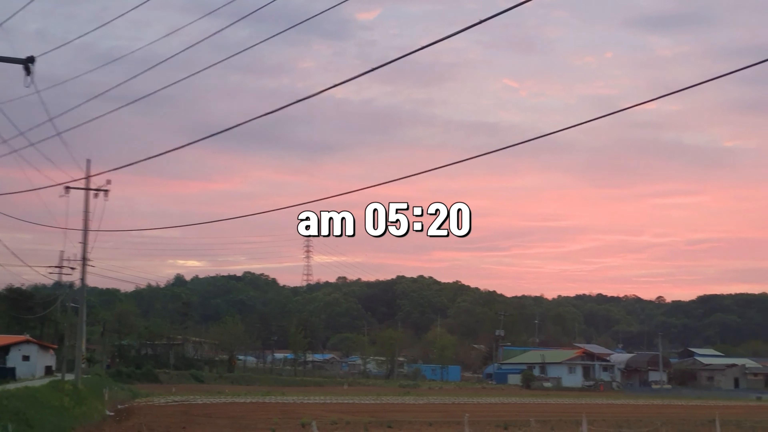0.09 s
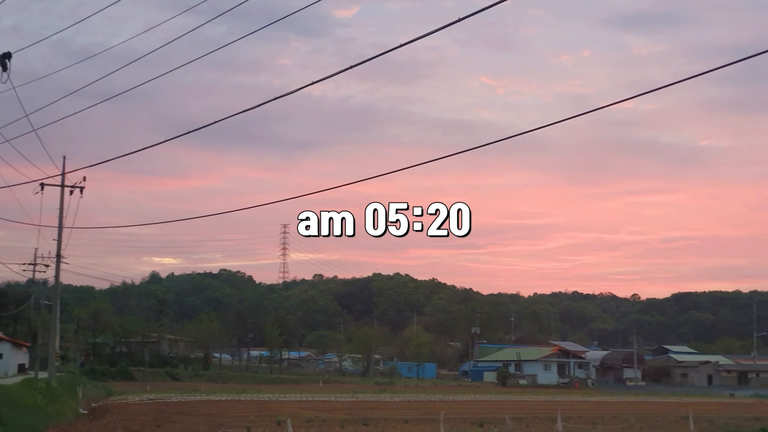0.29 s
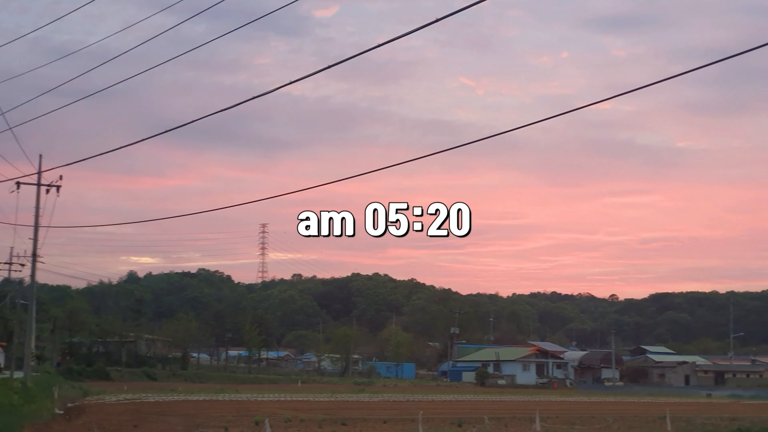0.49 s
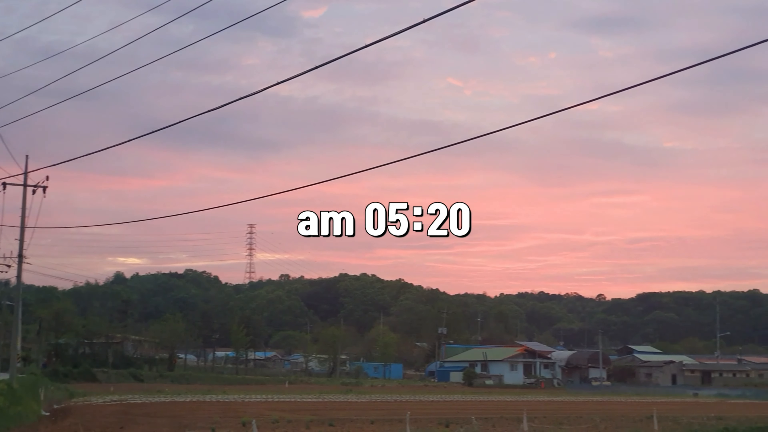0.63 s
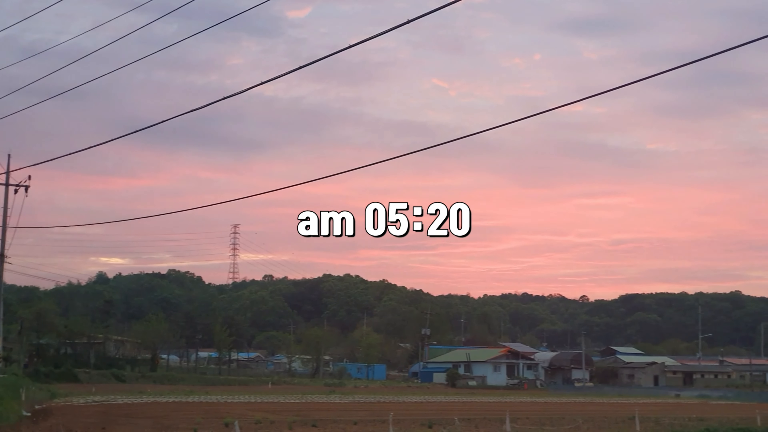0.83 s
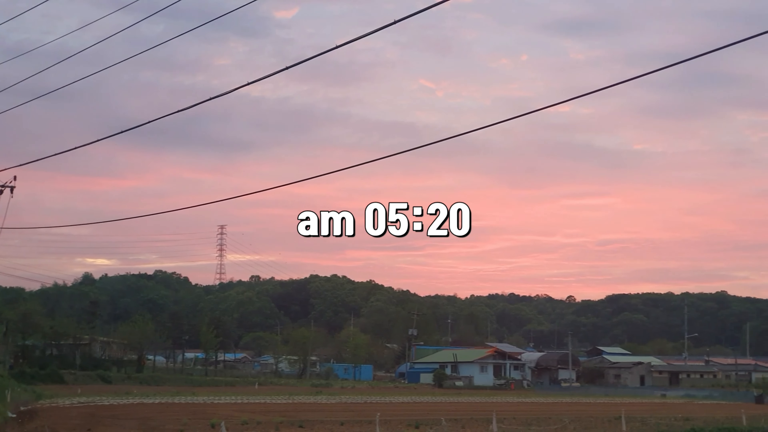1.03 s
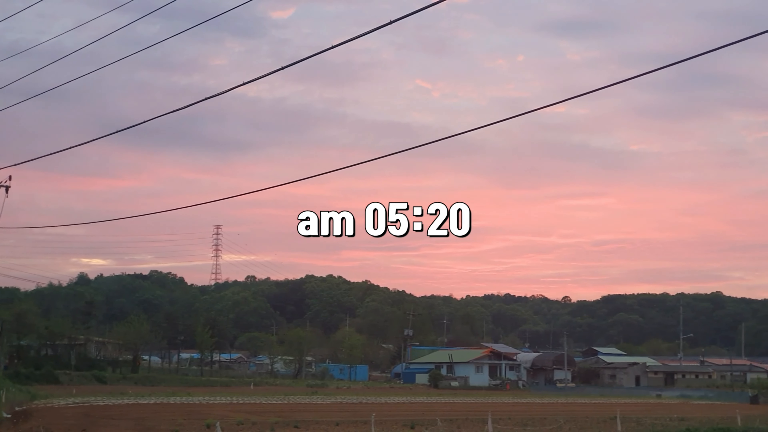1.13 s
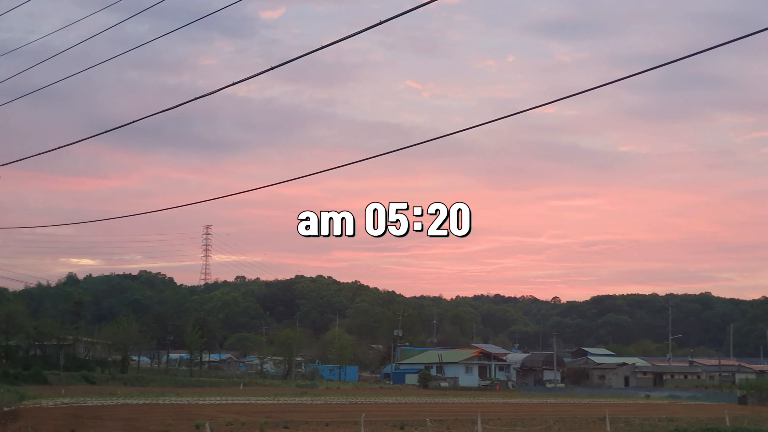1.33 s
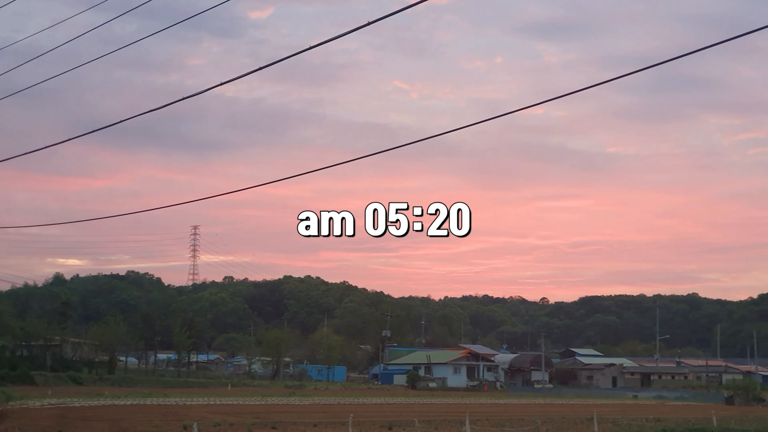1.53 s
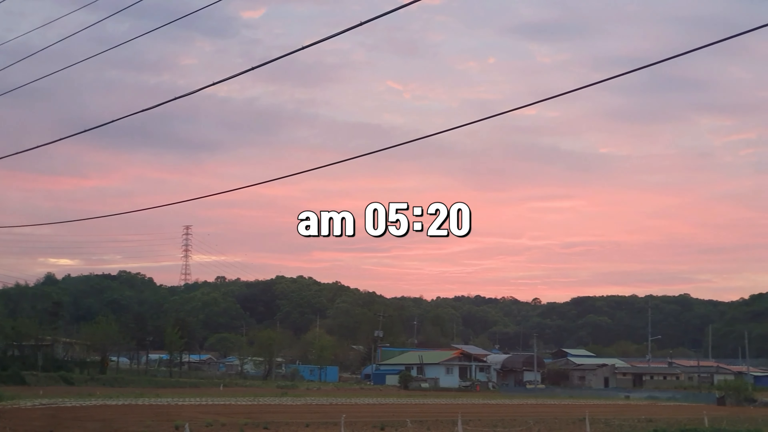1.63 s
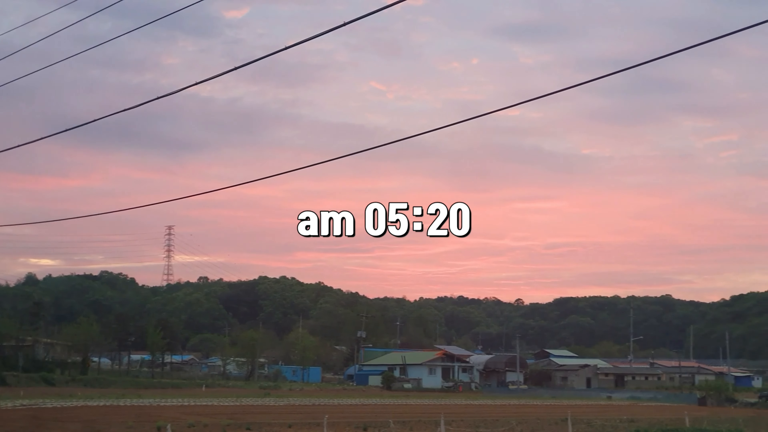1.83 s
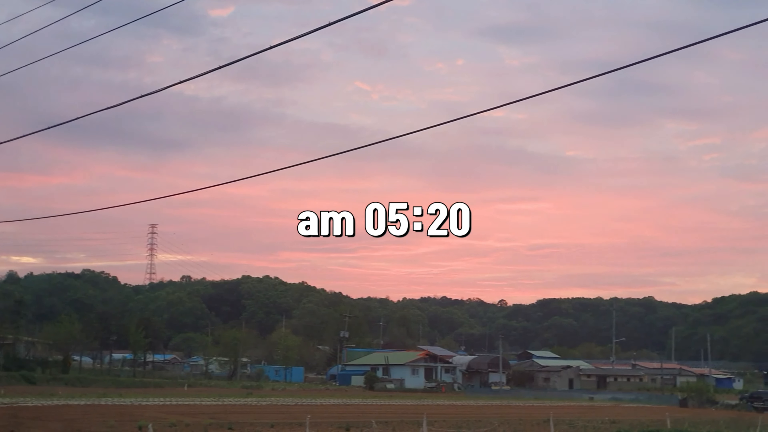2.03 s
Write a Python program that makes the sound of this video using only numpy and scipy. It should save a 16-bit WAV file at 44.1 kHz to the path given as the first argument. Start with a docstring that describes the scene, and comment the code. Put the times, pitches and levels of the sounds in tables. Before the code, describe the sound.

Many small birds sing over quiet farmland, one near with buzzy bursts and later a crisp chirp, others echoing in trees; distant wavering call, faint cow, soft low rumble and hum, picked up outdoors in stereo.

```python
"""Fields at dawn: a small bird close by gives two raspy bursts of twitter, a lone later buzz and a few clear
chirps, while others whistle from the trees and a far chorus blurs into echo. A faint drawn-out call carries
from the farms and a cow starts to low, over a soft hum and the rumble of open air. Birds are gliding sines
with frequency modulation, call and cow are wavering partials, air is shaped noise, and echo is
convolution with decaying noise."""
import sys
import numpy as np
from scipy import signal
from scipy.fft import rfft, irfft
from scipy.io import wavfile

SR = 44100
rng = np.random.default_rng(int(sys.argv[2]) if len(sys.argv) > 2 else 0)


def master(y):
    """Save y as 16-bit WAV."""
    cut = np.clip(np.atleast_2d(y).T, -1, 1)
    pcm = np.round(cut * 32767)  # scale
    wavfile.write(sys.argv[1], SR, pcm.astype(np.int16))


N = 92610

CHIRP_RASP = .009  # spread of the pitch tremble, as a share of the pitch
CLEAR_OCTAVE_DB = -36  # octave overtone of every bird note but the twitter, and of the murmurs


def undb(db):
    """Amplitude gain is exponential in decibels."""
    return 10 ** (np.asarray(db) / 20)


def unit(x):
    """Normalisation: dividing by the root mean square gives unit power."""
    return x / np.sqrt(np.mean(x ** 2) + 1e-20)


def bin_hz():
    """The discrete Fourier transform samples the spectrum at equal steps of frequency."""
    return np.arange(N // 2 + 1) * SR / N


def on_bins(points):
    """Logarithmic frequency scale: a (Hz, value) curve is interpolated over log frequency."""
    hz, value = np.array(points, float).T
    return np.interp(np.log(bin_hz() + 1e-3), np.log(hz), value)


def coloured(points):
    """Spectral shaping: white noise is weighted by a (Hz, dB) curve, at rms 1."""
    white = rfft(rng.standard_normal(N))
    return unit(irfft(white * undb(on_bins(points)), N))


def walk(rate_hz):
    """Low-pass noise: a Gaussian filter leaves a smooth random motion of rms 1."""
    white = rfft(rng.standard_normal(N))
    return unit(irfft(white * np.exp(-(bin_hz() / rate_hz) ** 2), N))


def curve(rows):
    """Envelope: (seconds, value) rows joined by straight lines."""
    rows = np.array(rows, float)
    return np.interp(np.arange(N) / SR, rows[:, 0], rows[:, 1])


def scatter(x, t60, build_s):
    """Diffuse reverberation from trees and hills: convolution with decaying noise, independent in each ear."""
    t = np.arange(SR) / SR
    decay = np.exp(-np.log(1000) * t / t60)  # down 60 dB after t60 seconds
    build = 1 - np.exp(-t / build_s)
    tail = rng.standard_normal((2, SR)) * decay * build
    tail /= np.sqrt(np.sum(tail ** 2, axis=1, keepdims=True))
    return signal.fftconvolve(np.atleast_2d(x), tail, axes=1)[:, :N]


def sing(notes, rasp, octave_db, buzz=0):
    """Frequency modulation: a sine arcs through three pitches, with tremble, weak octave and optional buzz."""
    tremble_hz, buzz_hz = 280, 490
    attack_s, release_s = .0018, .002
    swell_share = .28  # longer notes swell in over this share of their length
    out = np.zeros((2, N))
    tremble = walk(tremble_hz)
    for start, length, first, middle, last, db, pan_db in notes:
        i = np.arange(max(int(start * SR), 0), min(int((start + length) * SR), N))
        t = i / SR - start
        parabola = np.polyfit([0, .5, 1], [first, middle, last], 2)
        arc = np.polyval(parabola, t / length)
        # the tremble also unsettles the phase of the buzz
        shake = rasp * tremble[i] + buzz * np.sin(2 * np.pi * buzz_hz * t + tremble[i] / 2)
        phase = 2 * np.pi * np.cumsum(arc * (1 + shake)) / SR
        fade_in = np.sin(np.pi / 2 * np.clip(t / max(attack_s, swell_share * length), 0, 1))
        fade_out = np.sin(np.pi / 2 * np.clip((length - t) / release_s, 0, 1))
        wave = np.sin(phase) + undb(octave_db) * np.sin(2 * phase)
        tone = np.sqrt(2) * fade_in * fade_out * wave
        out[:, i] += undb(db + np.array([[pan_db], [-pan_db]]) / 2) * tone
    return out


def late(x, delay_s):
    """Fourier shift theorem: a phase linear in frequency delays the sound by a fraction of a sample."""
    return irfft(rfft(x) * np.exp(-2j * np.pi * bin_hz() * delay_s), N)


def nearby(x, lag_s):
    """Interaural delay and specular reflection: the right ear lags, and close surfaces add distinct echoes."""
    # Echoes off ground and walls. Each row: delay in seconds, gain at left in dB, gain at right in dB.
    echoes = [(.0042, -41, -6.5), (0.0171, -6.5, -19.5)]
    x = np.array([x[0], late(x[1], lag_s)])
    out = x.copy()
    for delay_s, *gains_db in echoes:
        out += np.array([undb(db) * late(side, delay_s) for side, db in zip(x, gains_db)])
    return out


def field(points, alike):
    """Interaural correlation: independent sum and difference noises are weighted to set left-right likeness."""
    mid = irfft(rfft(coloured(points)) * np.sqrt(1 + alike), N)
    side = irfft(rfft(coloured(points)) * np.sqrt(1 - alike), N)
    return unit(np.array([mid + side, mid - side]))


def hum():
    """Steady tones of distant machinery: sines slowly modulated in amplitude and phase."""
    # Each row: frequency in Hz, mean level in dB.
    hum_tones = [(58.3, -60), (115.3, -64)]
    t = np.arange(N) / SR
    out = np.zeros(N)
    for hz, db in hum_tones:
        level = undb(db + 1.96 * walk(8.7))
        out += np.sqrt(2) * level * np.sin(2 * np.pi * hz * t + .78 * walk(3.5))
    return out


def air():
    """Broadband noise: a fluttering low rumble and a thin high hiss, partly alike in the two ears, with hum."""
    # Spectrum of the rumble. Each row: frequency in Hz, relative density in dB per Hz.
    low_shape = [(12, -34), (22, -1.5), (45, -0.5), (100, -5), (150, -10), (200, -8), (330, -15),
                 (500, -11.5), (720, -18.5), (1100, -20.5), (1900, -71)]
    # Spectrum of the hiss. Each row: frequency in Hz, relative density in dB per Hz.
    high_shape = [(700, -7.5), (900, 6.5), (1500, 1.5), (2200, -0.5), (3100, 3), (5000, -4), (7400, -1.5),
                  (9000, -14.5), (12000, -9.5), (15500, -9.5)]
    # Left-right correlation. Each row: frequency in Hz, correlation from -1 to 1.
    likeness = [(30, 0.58), (120, 0.9), (300, 0.8), (700, -0.074), (1500, -0.48), (5000, 0.17),
                (15000, -0.09)]
    alike = np.clip(on_bins(likeness), -.95, .95)
    flutter_db = 1.2 * walk(17)
    low = undb(-53 + flutter_db) * field(low_shape, alike) + hum()
    high = undb(-55) * field(high_shape, alike)
    # both lean to the left
    return low * undb([[.8], [-.8]]) + high * undb([[.6], [-.6]])


def murmurs():
    """Reverberant blurring: soft, dull, distant sounds are low gliding tones smeared by echo."""
    # Each row: start and length in seconds, start, middle and end pitch in Hz,
    # level in dB before the mix below, left minus right in dB.
    murmur_notes = [(.2, 0.066, 510, 472, 478, -61.5, 0.5), (.45, 0.087, 231, 308.5, 323, -62.5, 3.5),
                    (.45, 0.081, 174, 188, 187, -59.5, 1)]
    voice = sing(murmur_notes, .022, CLEAR_OCTAVE_DB)
    return undb(5.5) * voice + undb(-6) * scatter(voice, t60=.33, build_s=.0061)


def far_call():
    """Selective propagation: of a long wavering animal call only the strongest partial carries over the fields."""
    # Each row: time in seconds, level in dB.
    call_level = [(.15, -75), (.42, -63), (.59, -56), (.9, -61), (.99, -52), (1.04, -64), (1.18, -53),
                  (1.33, -62), (1.55, -60), (1.8, -71)]
    pitch_hz = 981 * (1 + .033 * walk(100))
    phase = 2 * np.pi * np.cumsum(pitch_hz) / SR
    tone = np.sin(phase) * undb(3.9 * walk(26))
    return undb(curve(call_level)) * unit(tone + undb(-3.5) * scatter(tone, t60=.23, build_s=.006))


def cow():
    """Harmonic series: a faint low sums multiples of one nearly steady fundamental."""
    # Each row: time in seconds, level in dB before the harmonics are weighted.
    moo_level = [(.7, -66), (1.3, -66.5), (1.52, -64.5), (1.62, -53.5), (1.72, -66), (2.1, -61.5)]
    # Each row: multiple of the fundamental, relative level in dB.
    harmonics = [(1, -0.5), (2, -11), (3, -0.5), (9, -6.5)]
    pitch_hz = 187.9 * (1 + .0079 * walk(25.5))
    phase = 2 * np.pi * np.cumsum(pitch_hz) / SR
    voice = sum(undb(db) * np.sin(round(k) * phase) for k, db in harmonics)
    voice = voice * undb(curve(moo_level))
    return voice + undb(-4) * scatter(voice, t60=.45, build_s=.02)


def chorus():
    """Diffuse field: a crowd of random far notes is heard only through its reverberation."""
    # Each row: time in seconds, relative level in dB.
    chorus_swell = [(0, -10), (.4, -2), (1.2, -4), (1.42, -2.5), (1.75, 3.5), (2.1, -1.5)]
    notes_per_s, note_s = 130, .03
    centre_hz, octaves = 4250, .6  # pitches spread this many octaves either way
    glide_range = .22  # span of the random pitch bends, as a share of the pitch
    notes = []
    for when, size, bend, slope, pitch, loud in rng.random((int(notes_per_s * N / SR), 6)):
        hz = centre_hz * 2 ** (octaves * (2 * pitch - 1))
        glide = glide_range * (slope - .5)
        middle_hz = hz * (1 + glide_range * (bend - .5))
        length_s = note_s * (.5 + size)
        notes.append((when * N / SR, length_s, hz * (1 - glide), middle_hz, hz * (1 + glide), -8 * loud, 0))
    voice = sing(notes, CHIRP_RASP, CLEAR_OCTAVE_DB)
    return undb(-52.5 + curve(chorus_swell)) * unit(scatter(voice, t60=.15, build_s=.005))


def whistles():
    """Direct-to-reverberant ratio: birds in the trees send more echo than direct sound."""
    # Each row: start and length in seconds, start, middle and end pitch in Hz,
    # level in dB before the mix below, left minus right in dB.
    whistle_notes = [(0, 0.011, 3210, 3046, 3000, -39.5, -2.5), (.335, 0.026, 5630, 5670, 3800, -47, 9),
                     (.426, 0.014, 5460, 6020, 6040, -47.5, -12.5),
                     (.472, 0.012, 5000, 4950, 4760, -49.5, -7), (.49, 0.054, 3840, 3944, 4510, -55, 12.5),
                     (.495, 0.052, 7400, 7900, 8930, -64.5, -14), (.55, 0.145, 4490, 4550, 4570, -60, -10),
                     (.615, 0.043, 3216, 3024, 2957, -48.5, -2), (.59, .16, 7440, 7490, 7240, -65, -15),
                     (.38, 0.039, 4230, 3580, 4340, -52, 2), (.682, 0.02, 4380, 3980, 3990, -48.5, 8),
                     (.703, 0.035, 3000, 3130, 3200, -54, 2), (.78, 0.021, 4030, 3360, 2830, -58, 9),
                     (.71, 0.034, 5220, 5450, 5410, -57, -5), (.835, 0.022, 2610, 3260, 3820, -48.5, 7),
                     (.98, 0.014, 5190, 5800, 6000, -59, -2), (.994, 0.013, 2820, 3070, 3000, -45.5, 1),
                     (1.02, 0.0094, 5100, 5510, 6100, -48.5, 14), (1.075, 0.031, 3553, 4290, 5200, -52, 11),
                     (1.10, 0.016, 4870, 4490, 3800, -45, -3), (1.12, 0.019, 3130, 3170, 3150, -51, 2),
                     (1.252, 0.025, 5700, 5800, 6300, -47.5, -4), (1.292, 0.03, 4820, 5090, 5800, -51, -8),
                     (1.35, 0.039, 3056, 3190, 3040, -50.5, 10), (1.44, 0.064, 5596, 4440, 4110, -46, 1),
                     (1.502, 0.025, 2630, 2550, 2230, -57, 11.5), (1.543, 0.032, 2790, 3250, 3390, -48, 3),
                     (1.59, 0.034, 2860, 3115, 3280, -46, 8), (1.61, 0.022, 4510, 4740, 5160, -44, -1),
                     (1.712, 0.017, 3140, 3590, 3780, -44, 0), (1.752, .012, 3780, 2950, 2270, -56.5, 12),
                     (1.77, 0.061, 5550, 5320, 5470, -58, -15), (1.818, 0.024, 4550, 4560, 4750, -47.5, -4),
                     (1.848, 0.016, 5830, 5350, 4860, -61, 0), (1.81, .014, 3450, 3346, 2540, -49, 9),
                     (1.866, 0.0084, 3570, 2930, 2740, -53, 17.5),
                     (1.959, 0.024, 4850, 4590, 4660, -44.5, 1), (1.993, 0.0076, 2600, 2440, 1980, -48, -5),
                     (1.99, 0.024, 3900, 3220, 2560, -46, 3.5)]
    voice = sing(whistle_notes, .016, CLEAR_OCTAVE_DB)
    return undb(-3) * voice + undb(-.3) * scatter(voice, t60=.21, build_s=.001)


def chirps():
    """Near-pure tones: short clear notes close by reach the left ear first and leave a light tail."""
    # Each row: start and length in seconds, start, middle and end pitch in Hz,
    # level in dB, left minus right in dB.
    chirp_notes = [(.635, 0.0059, 2840, 3140, 3040, -37, 5), (1.012, 0.0052, 3140, 3190, 2880, -38, 5),
                   (1.199, 0.0075, 3080, 3100, 3350, -44, 11),
                   (1.336, 0.0064, 3360, 3060, 3120, -36.5, 7.5), (1.473, 0.014, 4950, 5900, 6200, -41, -7),
                   (1.631, 0.01, 3840, 4100, 4400, -41.5, 11),
                   (1.638, 0.0095, 4490, 4745, 5150, -27.5, -3.5),
                   (1.647, 0.0053, 5270, 5650, 4850, -29.5, -5.5),
                   (1.651, 0.011, 5230, 4250, 3700, -33.5, 2), (1.674, 0.015, 3950, 4240, 4110, -25.5, -4)]
    voice = sing(chirp_notes, CHIRP_RASP, CLEAR_OCTAVE_DB)
    return nearby(voice, lag_s=.000429) + undb(-15.5) * scatter(voice, t60=.43, build_s=.003)


def twitter():
    """Fast frequency modulation: shaken whistles buzz among thin gliding strokes, with hiss and foliage echoes."""
    # Buzzes, whistles shaken very fast. Each row: start and length in seconds,
    # start, middle and end pitch in Hz, level in dB, left minus right in dB.
    buzz_notes = [(.166, .032, 5500, 4700, 5200, -46.5, -2), (.193, .012, 6100, 6200, 7000, -37, -3),
                  (.206, .015, 5150, 5650, 5400, -22.5, -3), (.217, .026, 5250, 4850, 4400, -25, -1),
                  (.866, .036, 4700, 5500, 5800, -43.5, -5), (.9, .013, 5750, 5950, 7300, -33.5, -5),
                  (.914, .016, 4700, 5000, 4500, -23.5, -1), (1.483, .019, 4900, 4450, 5000, -34, -1)]
    # Thin gliding strokes around the buzzes. Each row: start and length in seconds,
    # start, middle and end pitch in Hz, level in dB, left minus right in dB.
    strokes = [(.205, .005, 4200, 4700, 5400, -27, -2), (.244, .014, 4450, 4650, 5350, -29, 0),
               (.25, .027, 3900, 3750, 3500, -36, 10), (.257, .005, 8600, 8200, 7800, -40, -8),
               (.263, .006, 6800, 6550, 6600, -32, -1), (.27, .007, 8700, 7200, 6200, -37, -2),
               (.278, .032, 3400, 3100, 3000, -48, 7), (.282, .014, 6900, 6100, 5750, -32, -4),
               (.296, .014, 6000, 5750, 5800, -36, -3), (.911, .006, 3800, 4350, 4900, -30, 1),
               (.931, .004, 4700, 4300, 3900, -29, 0), (.932, .01, 7400, 6800, 7500, -28, -4),
               (.936, .03, 3800, 3000, 2850, -47, 9), (.942, .007, 8900, 7300, 6600, -35, -3),
               (.954, .013, 6850, 6600, 6000, -33, -4), (.967, .01, 6400, 5900, 5100, -36, -1)]
    # Spectrum of the air in the voice. Each row: frequency in Hz, relative level in dB.
    hiss_shape = [(2500, -13.5), (4500, 8), (7500, 7), (9500, -1), (15000, -5)]
    octave_db = -21.5
    voice = sing(buzz_notes, .031, octave_db, buzz=.078)  # shake depth as a share of the pitch
    voice = voice + sing(strokes, .034, octave_db)
    # the hiss follows the power of the voice, smoothed over 70 ms
    smooth = np.hanning(int(.07 * SR))
    power = signal.fftconvolve(np.mean(voice ** 2, axis=0), smooth / smooth.sum(), "same")
    effort = np.sqrt(np.abs(power))
    hiss = undb(-15) * effort * np.array([coloured(hiss_shape), coloured(hiss_shape)])
    foliage = undb(-10) * scatter(voice, t60=.1, build_s=.002)
    tail = undb(-13.5) * scatter(voice, t60=.42, build_s=.024)
    return nearby(voice, lag_s=.000365) + hiss + foliage + tail


def scene():
    """Superposition: air, animals and birds near and far over the farmland add linearly."""
    background = air() + murmurs() + far_call() + cow()
    return background + chorus() + whistles() + chirps() + twitter()


def record(dry):
    """Band limitation: the recorder's steep elliptic low-pass cuts the top above 15850 Hz."""
    low_pass = signal.ellip(10, .2, 70, 15850, fs=SR, output="sos")  # .2 dB ripple, 70 dB stop band
    return signal.sosfilt(low_pass, dry)


dry = scene()
out = record(dry)
master(out)
```